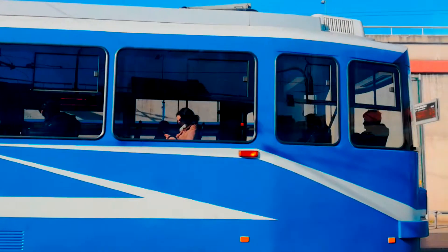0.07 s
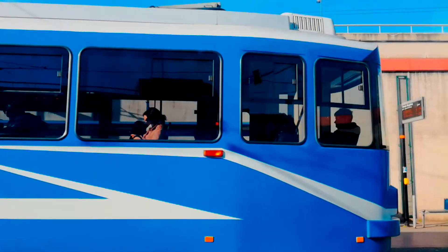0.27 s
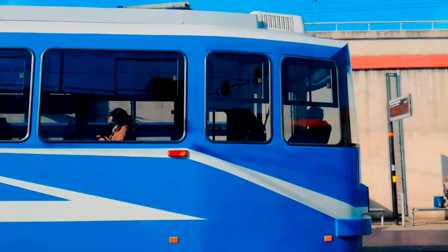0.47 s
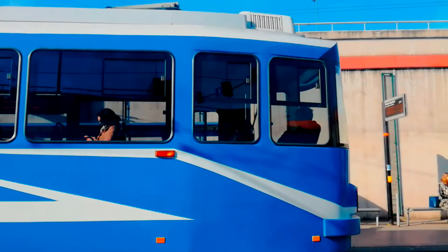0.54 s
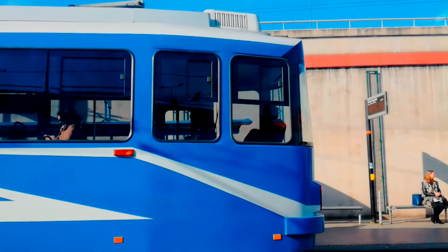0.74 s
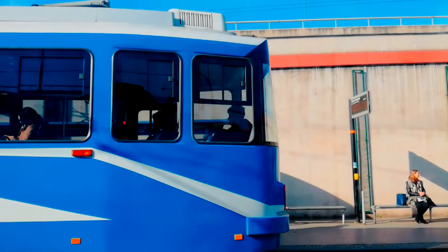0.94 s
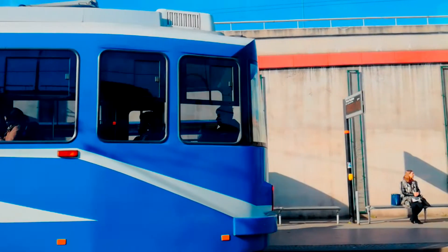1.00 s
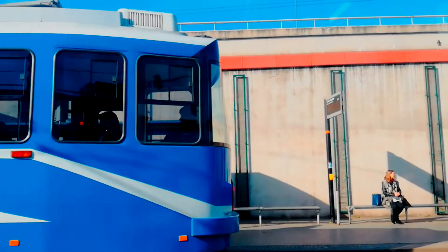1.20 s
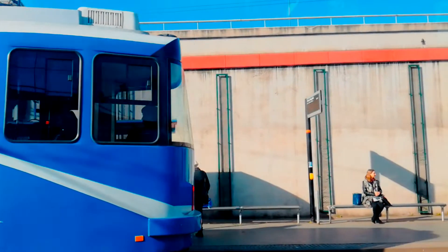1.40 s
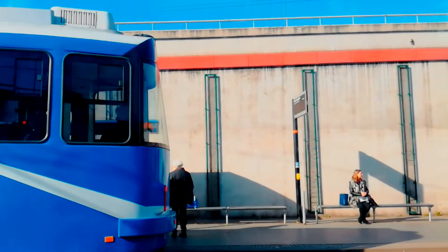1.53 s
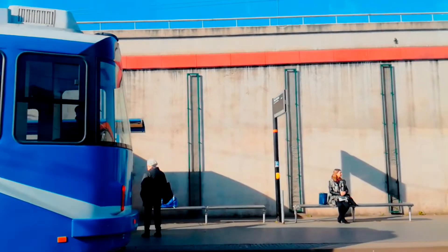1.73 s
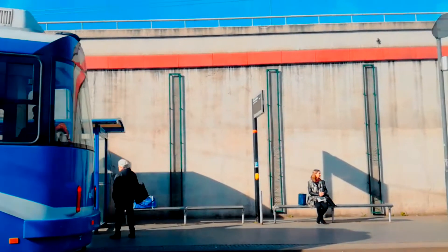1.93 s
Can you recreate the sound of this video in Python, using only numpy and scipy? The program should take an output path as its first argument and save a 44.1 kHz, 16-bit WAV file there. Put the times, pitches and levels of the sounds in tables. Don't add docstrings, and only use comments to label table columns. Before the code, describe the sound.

Tram rumbling off along rails on the left, a dull rattling knock close on the right

```python
import sys
import numpy as np
from scipy import signal
from scipy.fft import rfft, irfft, next_fast_len
from scipy.io import wavfile
from scipy.ndimage import uniform_filter1d, map_coordinates

SR = 44100
rng = np.random.default_rng(int(sys.argv[2]) if len(sys.argv) > 2 else 0)


def level_to_linear(level):
    exponent = np.asarray(level, float) / 20
    return 10 ** exponent


def output_pcm(signal):
    pcm = np.clip(np.atleast_2d(signal).T, -1, 1) * 32767
    wavfile.write(sys.argv[1], SR, np.round(pcm).astype(np.int16))


N = 85995
LEAD = 4096
TIME = (np.arange(N + 2 * LEAD) - LEAD) / SR


def unit(x):
    return x / np.sqrt(np.mean(x ** 2) + 1e-20)


def along(points, hz):
    f, v = np.transpose(points)
    return np.interp(np.log(hz + 1), np.log(f + 1), v)


def wobble(rate):
    knots = rng.standard_normal(int(len(TIME) * rate / SR) + 4)
    return map_coordinates(knots, [(TIME - TIME[0]) * rate])


def filtered(x, response):
    m = next_fast_len(len(TIME))
    return irfft(rfft(x, m) * response(np.fft.rfftfreq(m, 1 / SR)), m)[..., :len(TIME)]


# frequency in Hz, level in dB per Hz.
SHUT = [(13500, -120)]


def rush(spectrum, patchy_db, shape=None):
    hz, s, z = signal.stft(rng.standard_normal((2, len(TIME))), SR, nperseg=256)
    field = uniform_filter1d(rng.standard_normal(z.shape[1:]), size=3, axis=0)
    field = uniform_filter1d(field, size=12, axis=1)
    z = z * level_to_linear(patchy_db * unit(field))
    if shape is not None:
        z = z * shape(hz[:, None], s[None] + TIME[0])
    noise = signal.istft(z, SR, nperseg=256)[1][:, :len(TIME)]

    def colour(f):
        return level_to_linear(along(spectrum + SHUT, f))

    scale = np.sqrt(np.mean(colour(np.fft.rfftfreq(len(TIME), 1 / SR)) ** 2))
    return filtered(noise, colour) / scale


# frequency in Hz, far ear level in dB.
SHADE = [(100, 2), (300, 0), (600, -6), (1000, -9.5), (2000, -15), (4000, -23), (12000, -32)]
# frequency in Hz, lag in seconds.
ROUND_HEAD = [(150, 0.00087), (500, 0.00082), (1500, 0.00069), (5000, .00056)]
# frequency in Hz, diffuse share at the far ear.
SCATTER = [(100, 0.058), (400, 0.2), (1000, 0.26), (3000, 0.21)]


def head(near, other):
    def share(f):
        return np.clip(along(SCATTER, f), 0, 1)

    def direct(f):
        lag = np.exp(-2j * np.pi * f * along(ROUND_HEAD, f))
        return level_to_linear(along(SHADE, f)) * np.sqrt(1 - share(f) ** 2) * lag

    def diffuse(f):
        return level_to_linear(along(SHADE, f)) * share(f)

    return np.array([near, filtered(near, direct) + filtered(other, diffuse)])


# frequency in Hz, level in dB per Hz.
RUMBLE = [(8.8, -32.5), (15, 1.5), (38, -0.5), (54, -4.5), (81, -1.5), (113, -22.5), (160, -30.5),
          (210, -54.5), (350, -120)]
# time in seconds, level in dB.
HEAVE = [(0, -50), (.1, -54), (.2, -51.5), (.4, -53), (.6, -54), (.75, -55.5), (.87, -52), (1.0, -57),
         (1.15, -57), (1.3, -54), (1.45, -52), (1.55, -51.5), (1.65, -52), (1.78, -52), (1.95, -54)]


def rumble():
    lag_s = .00025
    low = rush(RUMBLE, patchy_db=0.07) * level_to_linear(np.interp(TIME, *np.transpose(HEAVE)) + 3.5)
    late = filtered(low[0], lambda f: level_to_linear(0.86) * np.exp(-2j * np.pi * f * lag_s))
    return np.array([low[0], late + 0.041 * low[1]])


# frequency in Hz, level in dB per Hz.
ROAR = [(60, -30.5), (120, -5.5), (200, -7.5), (400, -18), (800, -24.5), (1500, -33.5), (3000, -42.5),
        (8000, -55.5)]
# time in seconds, rolling effort in dB.
EFFORT = [(0, -3.5), (0.252, 7.5), (.55, -2.5), (.9, -2.5), (1.301, -5.5), (1.449, 6), (1.651, 4),
          (1.95, -5)]


def rail_roar():
    roar_db, db_per_effort_db = -65.5, 0.77
    effort_db = np.interp(TIME, *np.transpose(EFFORT))
    level_db = roar_db + db_per_effort_db * effort_db
    noise = rush(ROAR, patchy_db=2.5)
    return head(*(noise * level_to_linear(level_db + 1.0 * wobble(8.03))))


# start in seconds, level in dB, swell in seconds, stretch of the fade,
# tilt in dB per octave.
SWISHES = [
    (-0.213, -77, 0.26, 2.8, 1.5),
    (.298, -58, 0.037, 0.91, -1),
    (1.348, -64.5, 0.053, 1.6, -5),
    (1.384, -71, 0.0044, 0.87, 14),
    (1.372, -58.5, 0.076, 1.02, -0.5),
]
# frequency in Hz, level in dB per Hz.
AIR = [(150, -3.5), (500, -3.5), (750, -9), (1150, -7.5), (1800, -15), (3200, -16.5), (5500, -24),
       (12800, -55.5)]
# frequency in Hz, time to fall 60 dB in seconds.
FADE = [(200, 1.1), (1000, 0.67), (3000, 0.57), (8000, 0.29)]


def swishes():
    late_s_per_octave = 0.0048

    def shape(hz, s):
        power = 0
        octave = np.log2(1 + hz / 500)
        for start, db, swell, stretch, tilt_db in SWISHES:
            age = s - start - late_s_per_octave * octave
            rise = np.sin(np.pi / 2 * np.clip(age / swell, 0, 1)) ** 2
            fade_db = 60 * np.maximum(age - swell, 0) / (stretch * along(FADE, hz))
            power = power + (rise * level_to_linear(db + tilt_db * (octave - 2.5) - fade_db)) ** 2
        return np.sqrt(power)

    air = rush(AIR, patchy_db=.7, shape=shape)
    return head(*(air * level_to_linear(.6 * wobble(40))))


# frequency in Hz, level in dB per Hz.
HISS = [(200, -5.5), (1500, -1.5), (5000, -1), (8000, -5.5), (9600, -1), (10400, -6.5), (12800, -4)]


def microphone_hiss():
    hiss_db, duck_s, duck_db = -92, 0.216, -4
    level = level_to_linear(hiss_db - duck_db * (TIME < duck_s))
    return level * rush(HISS, patchy_db=0.1)


# time in seconds, push in dB, crack over push in dB,
# softness in milliseconds.
CONTACTS = [(0.2312, -30.5, -23, 0.76), (0.2363, -23, 4, 0.21), (0.2395, -29, -4, 0.071),
            (0.2415, -20, 1, 0.13), (0.2479, -27.5, 14, 0.087), (.2508, -23.5, -15, 0.88),
            (0.2545, -31, -18, .6), (0.2615, -30, -23, 0.47), (.2700, -35, -27, 0.47),
            (0.281, -30, -23, 2.23), (.2885, -37, -41, 0.61), (.2950, -32, -30, 1.8)]
# frequency in Hz, level in dB, time to fall 60 dB in seconds.
CASE = [(191, 2, 0.02), (348, -3, 0.03), (522, -14.5, 0.032), (728, -11, 0.032), (872, -17.5, 0.045),
        (1257, -6, 0.0076), (1550, -20, 0.0074), (3260, -16, .008)]


def case_contacts():
    crack_base_db, crack_t60 = -27, 0.002
    thump_s, thump_hz, thump_db, thump_t60 = .2418, 43.8, -18, 0.086
    out = np.zeros(len(TIME))
    t = np.arange(SR // 4) / SR
    ring = sum(level_to_linear(db - 60 * t / t60) * np.sin(2 * np.pi * hz * t) for hz, db, t60 in CASE)
    for s, db, crack_db, soft_ms in CONTACTS:
        blow = np.hanning(max(round(2 * soft_ms * SR / 1000), 1) + 2)
        body = np.convolve(ring, blow / blow.sum())[:len(t)]
        crack = level_to_linear(crack_db + crack_base_db - 60 * t / crack_t60) * rng.standard_normal(len(t))
        out[LEAD + round(s * SR):][:len(t)] += level_to_linear(db) * (body + crack)
    thump = level_to_linear(thump_db - 60 * t / thump_t60) * np.sin(2 * np.pi * thump_hz * t)
    out[LEAD + round(thump_s * SR):][:len(t)] -= thump
    return out


# start in seconds, level in dB, swell in seconds,
# time to fall 60 dB in seconds.
RATTLES = [
    (0.2354, -32.5, 0.0064, 0.0096),
    (0.246, -46, 0.0046, 0.095),
    (.284, -67.5, 0.0054, 0.037),
]
# frequency in Hz, level in dB per Hz.
GRIT = [(300, -11), (800, -12), (1300, -4), (1700, -9.5), (2300, -21.5), (4000, -26.5), (8000, -38.5),
        (12800, -44.5)]


def grit():
    shake = 0
    for s, db, swell, t60 in RATTLES:
        rise = np.clip((TIME - s) / swell, 0, 1)
        shake = shake + rise * level_to_linear(db - 60 * np.maximum(TIME - s - swell, 0) / t60)
    return rush(GRIT, patchy_db=-1.0)[0] * shake * level_to_linear(3.5 * wobble(600))


# frequency in Hz, far ear level in dB.
KNOCK_FAR = [(60, -2.7), (3000, -2), (6000, -22), (12000, -19)]


def knock():
    source = case_contacts() + grit()
    near, far = head(source, 0 * source)
    return np.array([filtered(far, lambda f: level_to_linear(along(KNOCK_FAR, f))), near])


def tick():
    tick_s, tick_db, far_db, ring_db, ring_t60 = .26849, -20, -21, -22, .005
    t = TIME - tick_s
    snap = -np.sinc(t * 30000) * np.exp(-(t / .0003) ** 2)
    ring = (t > 0) * level_to_linear(ring_db - 60 * np.abs(t) / ring_t60) * rng.standard_normal((2, len(t)))
    both = np.array([np.roll(snap, 3), snap]) + ring
    return level_to_linear(tick_db) * both * level_to_linear([[far_db], [0]])


def scene():
    top_hz, edge_hz = 16900, 500
    mix = rumble() + rail_roar() + swishes() + microphone_hiss() + knock() + tick()
    return filtered(mix, lambda f: np.clip((top_hz - f) / edge_hz, 0, 1))[:, LEAD:LEAD + N]


def low_pass(x):
    return signal.sosfilt(signal.butter(12, 16820, fs=SR, output="sos"), x)


def record(dry):
    fade_s = .008
    from_edge_s = np.minimum(np.arange(N), np.arange(N)[::-1]) / SR
    fades = np.sin(np.pi / 2 * np.clip(from_edge_s / fade_s, 0, 1)) ** 2
    return low_pass(dry * fades)


dry = scene()
out = record(dry)
output_pcm(out)
```